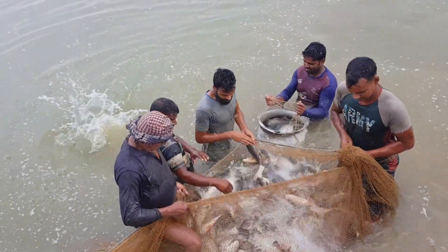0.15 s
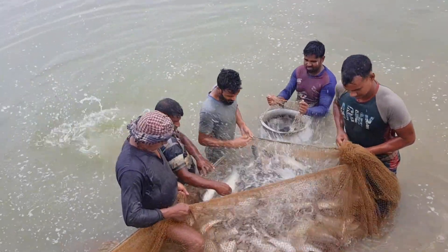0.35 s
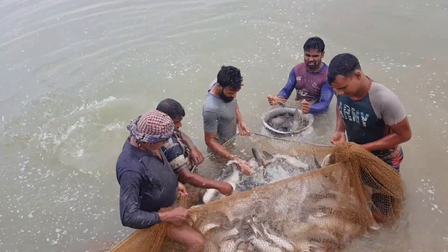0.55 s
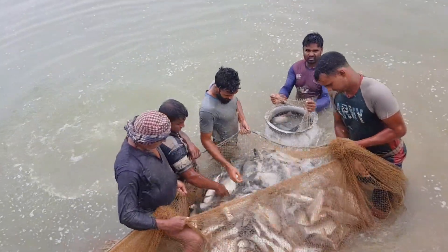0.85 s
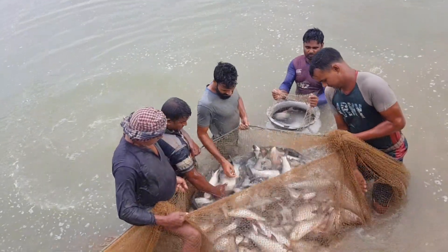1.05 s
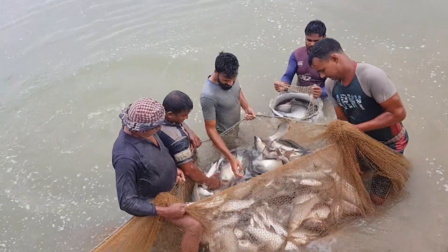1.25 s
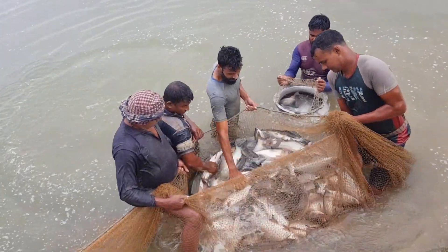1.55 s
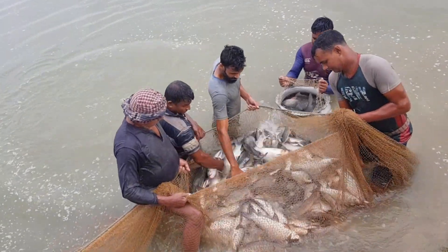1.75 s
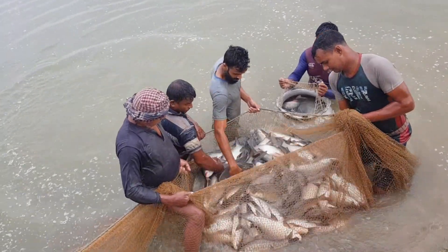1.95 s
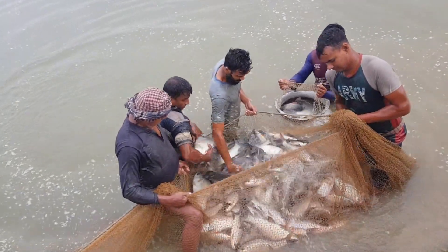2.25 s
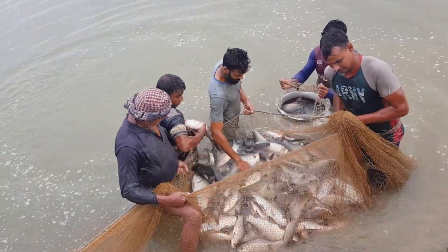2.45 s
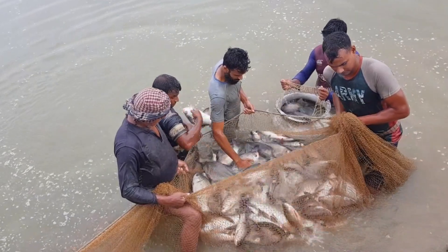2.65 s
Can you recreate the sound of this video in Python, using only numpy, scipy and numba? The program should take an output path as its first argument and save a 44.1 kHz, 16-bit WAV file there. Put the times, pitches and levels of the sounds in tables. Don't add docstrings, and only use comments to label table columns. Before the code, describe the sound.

Fish thrashing in a tight net, tails slapping shallow pond water with splashes and gurgles

```python
import sys
import numpy as np
from scipy import signal
from scipy.fft import rfft, irfft
from scipy.io import wavfile
from scipy.ndimage import uniform_filter1d
from numba import njit

SR = 44100
rng = np.random.default_rng(int(sys.argv[2]) if len(sys.argv) > 2 else 0)


def store_pcm(level_fs):
    pcm = np.round(np.clip(level_fs, -1, 1) * 32767).astype(np.int16)
    wavfile.write(sys.argv[1], SR, np.atleast_2d(pcm).T)


def gain_from_db(level_db):
    decades = np.asarray(level_db, float) / 20
    return 10 ** decades


N = 123479


def curve(rows, col, at, log=False):
    a = np.array(rows, float)
    return np.interp(at, np.log(a[:, 0]) if log else a[:, 0], a[:, col])


def band(x, lo_hz, hi_hz, order=2):
    return signal.sosfilt(signal.butter(order, [lo_hz, hi_hz], "band", fs=SR, output="sos"), x)


def walk(rate_hz):
    hold = int(SR / rate_hz)
    steps = np.repeat(rng.standard_normal(N // 50), hold)[:N]
    smooth = uniform_filter1d(uniform_filter1d(steps, hold // 2), hold // 2)
    return smooth / smooth.std()


@njit
def ring(n, sr, at, hz, cycles, size, glide, lag, pan):
    out = np.zeros((2, n))
    for g in range(len(at)):
        for c in range(2):
            start = (at[g] + (lag[g] if c == 0 else 0.)) * sr
            first = int(start) + 1
            life = cycles[g] / hz[g] * sr
            w = 2 * np.pi * hz[g] / sr
            turn = -1 / life + 1j * w
            z = np.exp(turn * (first - start)) * size[g] * (pan[g] if c == 0 else 1 / pan[g])
            turn, bend = np.exp(turn), np.exp(1j * w * glide[g] / life)
            shut, opening = np.exp(-.4 * w * (first - start)), np.exp(-.4 * w)
            for i in range(max(first, 0), min(n, first + int(4 * life))):
                out[c, i] += z.imag * (1 - shut)
                z *= turn
                turn *= bend
                shut *= opening
    return out


def bubbles(at, hz, cycles, size, glide, bearing):
    one = np.ones(len(at))
    lag_s = -0.000028 + 6e-5 * bearing[0]
    pan = gain_from_db(3.5 * bearing[1] / 2)
    return ring(N, 1. * SR, at, np.clip(hz, 60, 17000), cycles * one, size, glide * one, lag_s, pan)


def swarm(db, lo_hz, hi_hz, cycles, scatter_db, glide, count):
    u = rng.random((2, count))
    e = np.minimum(rng.exponential(size=(2, count)), 3.5)
    at = u[0] * (N - 1) / SR
    hz = lo_hz * (hi_hz / lo_hz) ** u[1]
    life = cycles * (.5 + .5 * e[1])
    size = gain_from_db(scatter_db * e[0]) * hz / np.sqrt(life) * (-1) ** np.arange(count)
    size *= np.sqrt(4 * N / SR / np.sum(size ** 2 * life / hz))
    size *= gain_from_db(db[(at * SR).astype(int)])
    return bubbles(at, hz, life, size, glide, rng.standard_normal((2, count)))


def bursts(rows, spray_db, rise_s, fall_s, spread, cycles, trim_db, count):
    a = np.array(rows, float)
    n = rng.standard_normal((len(a), 4, count))
    u = rng.random((len(a), 3, count))
    bearing = rng.standard_normal((len(a), 2, 1)) + .6 * n[:, 1:3]
    k = np.arange(count)
    fine, first = k % 6 > 0, k == 0
    rise = rise_s * np.where(first, .5, u[:, 1] * np.where(fine, 1.6, 1))
    fall = -fall_s * np.log(1 - u[:, 0]) * np.where(fine, 2.2, .7) * ~first
    late = rise + fall
    at = a[:, :1] + late - .65 * rise_s
    cluster_hz = a[:, 2:3] * np.exp(spread * n[:, 0] * ~first)
    hz = np.where(fine, 2500 * 5.73 ** u[:, 2], cluster_hz)
    drops_db = np.reshape(spray_db, (-1, 1)) - 2.0 + 3.93 * np.log2(hz / 10000)
    db = a[:, 1:2] + trim_db + np.where(fine, drops_db, 0) + 3 * first
    db = db - np.where(fine, 1.2, 3) * late / fall_s
    life = np.where(first, 1.8, 1) * cycles + 0 * hz
    size = gain_from_db(db) * np.sign(n[:, 3])
    return bubbles(at.ravel(), hz.ravel(), life.ravel(), size.ravel(), 0.038,
                   (bearing[:, 0].ravel(), bearing[:, 1].ravel()))


def pond():
    return gain_from_db(-92) * rng.standard_normal((2, N))


def wind(t):
    # (time [s], left level [dB], right level [dB])
    breeze = [
        (0, -49.5, -59),
        (.4, -54, -53),
        (.62, -48, -44),
        (.9, -55, -58),
        (1.2, -43, -62),
        (1.55, -62.5, -67),
        (1.82, -41.5, -55),
        (2.1, -54.5, -55),
        (2.4, -56.5, -58.5),
    ]
    # (time [s], peak level [dB], push + or pull - [ratio])
    puffs = [(0.078, -13, -1.44), (0.2026, -9.5, -1.15), (0.2234, -20, 0.34), (0.2414, 6.5, 0.46),
             (0.2533, -27, 0.91), (0.2838, -18, -1.5), (1.173, -19.5, -1.7), (1.208, -5, 1),
             (1.238, -13.5, -1.2), (1.7, -13, -1.45), (1.8036, -9, -0.65), (1.832, -13.5, -1.2),
             (1.8627, -15.5, -1.4), (2.002, -6, 0.36), (2.111, -8, 0.9), (2.13, -11, 0.79)]
    out = np.zeros((2, N))
    for c in range(2):
        gust_db = np.clip(7.4 * walk(30.13), -14, 5.5)
        rumble = band(rng.standard_normal(N), 26.7, 135.5, order=3)
        out[c] = rumble * gain_from_db(curve(breeze, c + 1, t) + 38.5 + gust_db)
    eddy_s = 0.0017
    eddies = sum(push * gain_from_db(db + 2.5) * np.exp(-.5 * ((t - s) / eddy_s) ** 2) for s, db, push in puffs)
    out[0] += signal.sosfiltfilt(signal.butter(1, 40, "high", fs=SR, output="sos"), eddies)
    return out


def spits(count):
    # (time [s], peak level [dB])
    spit_rows = [(0.2915, -23), (0.5257, -8), (0.743, -14), (0.7695, -11.5), (0.834, -22), (0.8546, -8),
                 (0.8773, -9.5), (0.996, -21), (1.2201, -23), (1.4033, -18), (2.0718, -10.5), (2.1444, -23),
                 (2.226, -20), (2.256, -32), (2.3156, -11), (2.446, -22), (2.6436, -12), (2.7564, -15)]
    a = np.array(spit_rows, float)
    u = rng.random((len(a), 3, count))
    n = rng.standard_normal((len(a), 3, count))
    rise_s, fall_s = 0.0018, .005
    at = a[:, :1] + rise_s * u[:, 0] - fall_s * np.log(1 - u[:, 1])
    hz = 4500 * 3.6 ** u[:, 2]
    size = gain_from_db(a[:, 1:2] + 1.5) * n[:, 0]
    return bubbles(at.ravel(), hz.ravel(), 1.4, size.ravel(), .03, (n[:, 1].ravel(), n[:, 2].ravel()))


def plops():
    # (time [s], peak level [dB], pitch [Hz])
    plop_rows = [(0.121, -22, 820), (0.186, -7, 1216), (0.236, -7.5, 748), (0.283, -10, 807),
                 (0.37, -14, 564), (0.436, -13, 743), (0.772, -16, 765), (1.097, -17.5, 655),
                 (1.24, -19, 1100), (1.317, -26, 1170), (1.334, -12, 703), (1.621, -15, 1160),
                 (1.681, -21, 840), (2.082, -16, 810), (2.171, -5, 853), (2.195, -12.5, 750),
                 (2.521, -10, 940), (2.624, -15.5, 530)]
    a = np.array(plop_rows, float)
    bearing = .5 * rng.standard_normal((len(a), 2)).T
    return bubbles(a[:, 0], a[:, 2], 6, gain_from_db(a[:, 1] - 7.5), 0.067, bearing)


def glugs():
    # (time [s], peak level [dB], pitch [Hz])
    pockets = [(0.215, -3.5, 258), (0.324, -16, 304), (0.41, -7.5, 695), (0.521, -5, 362),
               (0.628, -6.5, 228), (0.684, -8, 500), (0.754, -15, 760), (0.936, -23, 380),
               (1.307, -15, 258), (1.41, -8, 720), (1.454, -7.5, 416), (1.494, -12.5, 413),
               (1.973, -16, 224), (2.126, -9, 764), (2.168, -11, 323), (2.589, -6, 308), (2.615, -3, 283),
               (0.014, -18, 650), (0.175, -9.5, 262), (0.439, -14.5, 191), (0.522, -11.5, 310),
               (0.549, -11, 530), (0.649, -10, 236), (0.699, -29, 549), (0.796, -25, 188),
               (1.002, -19, 615), (1.419, -18, 313), (2.021, -14, 630), (2.639, -13, 450), (2.659, -9, 428)]
    a = np.array(pockets, float)
    n = rng.standard_normal((3, len(a), 3))
    at = a[:, :1] + np.array([.001, .007, .016])
    db = a[:, 1:2] + np.array([-3, -6, -8])
    hz = a[:, 2:3] * np.exp(n[0] * np.array([0, .25, .45]))
    return bubbles(at.ravel(), hz.ravel(), 1.34, gain_from_db(db).ravel(), 0.019, 0.83 * n[1:].reshape(2, -1))


def churn(t):
    # (time [s], churn level [dB], spray share [dB], depth share [dB])
    thrash = [(0, -25, -10.5, -6.5), (.17, -23.5, -5.5, -2), (.36, -21.5, -13.5, -4.5), (.48, -26.5, -4, 2),
              (.52, -23.5, -9.5, 1), (.605, -29.5, -4.5, -3.5), (.76, -24.5, -7.5, -3.5),
              (.92, -31, -6.5, -6), (1.29, -27.5, -15, -9), (1.35, -24.5, -10.5, 1),
              (1.5, -33.5, -5.5, 1.5), (1.68, -33, -8, -9), (1.8, -39, -7, -16), (1.968, -43, -5, -30),
              (2.005, -24, -9.5, -2.5), (2.2, -31.5, -6, -4), (2.29, -34.5, -3.5, -10),
              (2.56, -30.5, -13, -3.5), (2.66, -28.5, -6, -2.5)]
    db, surge = curve(thrash, 1, t), walk(60)
    spray_db = db + curve(thrash, 2, t)
    depth_db = db + curve(thrash, 3, t)
    froth = swarm(db + 1.0 + 1.3 * surge + 4.2 * walk(100), 1040, 6950,
                  cycles=4.27, scatter_db=1.0, glide=0.037, count=8000)
    spray = swarm(spray_db + 19.5 + 2.34 * surge + 0.5 * walk(85), 4200, 14300,
                  cycles=0.66, scatter_db=-2.7, glide=0.044, count=36000)
    slosh = swarm(depth_db - 3 + 2.2 * surge + 1.43 * walk(30.04), 557.5, 973,
                  cycles=2.2, scatter_db=0.5, glide=0.052, count=1100)
    deep = swarm(depth_db - 5 + 2.05 * surge + 2.9 * walk(22.09), 154.4, 405.6,
                 cycles=1.43, scatter_db=2.5, glide=0.03, count=600)
    return band(froth + spray, 850, 19400, order=3) + slosh + deep


def fin_ticks():
    # (time [s], peak level [dB], pitch [Hz])
    tick_rows = [
        (.6865, -8, 1950),
        (1.2345, -12, 1980),
        (1.981, -15.5, 3340),
        (2.029, -4, 2860),
        (2.316, -20, 5230),
        (.8035, -11.5, 2320),
    ]
    return bursts(tick_rows, 14.3, rise_s=0.0011, fall_s=0.0011, spread=.4, cycles=1.2,
                  trim_db=-2, count=36)


def tail_flicks():
    # (time [s], peak level [dB], bubble pitch [Hz])
    flick_rows = [(0.4363, -12.5, 1330), (0.503, -18, 1310), (0.6551, -13.5, 1600), (0.7132, -9, 3380),
                  (1.0431, -22, 1260), (1.3414, -21, 1200), (1.4196, -11, 2240), (1.6598, -13, 3100),
                  (1.8598, -21, 2420), (2.0746, -14, 2070), (2.1432, -17, 1240), (2.412, -16.5, 2300),
                  (.0972, -19.5, 1190), (.2314, -27, 1660), (.3277, -17.5, 1350), (.7612, -18, 1560),
                  (.8555, -27, 2360), (1.1817, -34, 1600), (1.4466, -18, 1860), (1.5085, -25.5, 1290),
                  (1.5903, -37, 1560), (1.6716, -32, 1290), (1.8143, -37, 2880), (1.8961, -36, 2500),
                  (2.1575, -11.5, 1880), (2.2328, -16.5, 2340), (2.4593, -18.5, 1600),
                  (2.5545, -18.5, 1650), (2.592, -26, 1650), (2.6214, -12, 1800), (.875, -17, 2300),
                  (1.397, -16.5, 1340), (2.68, -35, 2600)]
    return bursts(flick_rows, 8.0, rise_s=0.0055, fall_s=0.015, spread=0.23, cycles=2.04,
                  trim_db=-5, count=60)


def tail_slaps():
    # (time [s], peak level [dB], bubble pitch [Hz], spray share [dB])
    slap_rows = [(0.0678, -15, 1220, -6.5), (0.1455, -4, 2270, -8), (0.178, -0.5, 1300, -9),
                 (0.212, -4, 1560, -30), (0.2805, -9, 1240, -22), (0.414, -3.5, 1670, -10.5),
                 (0.5481, -13.5, 2360, -4.5), (0.6315, -10, 1500, -27), (0.6856, -8.5, 1570, -6),
                 (0.8022, -0.5, 2310, -19), (0.9379, -7.5, 1860, -19), (1.0862, -4, 1470, -18.5),
                 (1.2147, -7, 1960, -14), (1.2353, -8, 1066, -19), (1.3193, -7.5, 1220, -26),
                 (1.3755, -10.5, 1300, -15.5), (1.613, -10.5, 1540, -36), (1.7143, 0, 2640, -14),
                 (1.981, -14, 1060, -7), (2.0141, -5, 1395, -15.5), (2.1044, -4.5, 1960, -6.5),
                 (2.1318, -5, 1390, -11), (2.1976, -4.5, 1730, -13.5), (2.5078, -11, 1490, -12.5),
                 (2.6524, -3, 2690, -9.5), (2.7194, -0.5, 1555, -25), (2.759, -10, 1870, -21)]
    spray_db = np.array(slap_rows)[:, 3] + 24
    return bursts(slap_rows, spray_db, rise_s=0.0037, fall_s=.006, spread=0.29, cycles=1.92,
                  trim_db=-11.5, count=90)


def ports(x):
    # (frequency [Hz], level [dB])
    left_port = [
        (200, 2.5),
        (1400, 6),
        (2500, -1),
        (3500, -1),
        (7000, -13.5),
        (9500, -5.5),
        (12500, -2.5),
        (16000, -18.5),
    ]
    # (frequency [Hz], level [dB])
    right_port = [
        (200, 1),
        (1400, 6.5),
        (2500, 8),
        (4000, -4),
        (8000, -27.5),
        (10000, -18.5),
        (12500, -11.5),
        (16000, -17.5),
    ]
    hz = np.maximum(np.fft.rfftfreq(2048, 1 / SR), 20)
    dip_db = -4.5 * np.exp(-.5 * ((hz - 1019) / 70) ** 2)
    out = []
    for side, port in zip(x, (left_port, right_port)):
        cepstrum = irfft(np.log(gain_from_db(curve(port, 1, np.log(hz), log=True) + dip_db)))
        cepstrum[1:1024] *= 2
        cepstrum[1025:] = 0
        response = irfft(np.exp(rfft(cepstrum)))
        out.append(signal.fftconvolve(side, response)[:N])
    return np.array(out)


def scene():
    t = np.arange(N) / SR
    water = pond() + spits(count=120) + plops() + glugs() + churn(t)
    blows = fin_ticks() + tail_flicks() + tail_slaps()
    return ports(water + blows) + wind(t)


def roll_off(x):
    return signal.sosfilt(signal.butter(12, 16460, fs=SR, output="sos"), x)


def record(dry):
    rounded = np.tanh(0.78 * dry) / 0.92
    no_rumble = signal.sosfilt(signal.butter(1, 25, "high", fs=SR, output="sos"), rounded)
    top = signal.ellip(10, .3, 60, 15950, fs=SR, output="sos")
    return roll_off(signal.sosfilt(top, no_rumble))


dry = scene()
out = record(dry)
store_pcm(out)
```